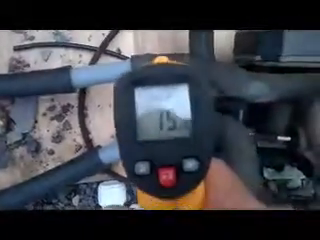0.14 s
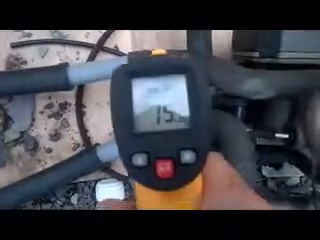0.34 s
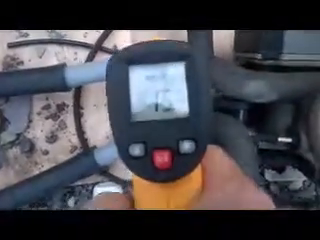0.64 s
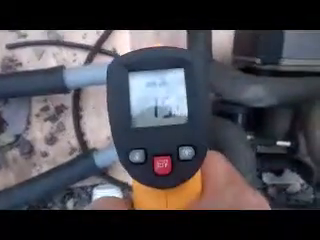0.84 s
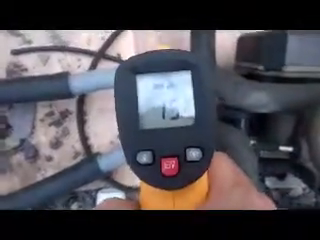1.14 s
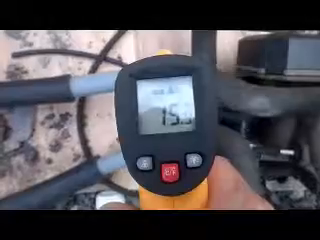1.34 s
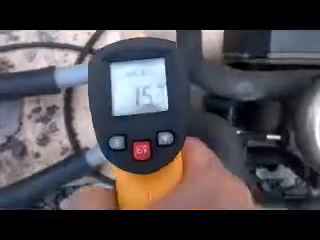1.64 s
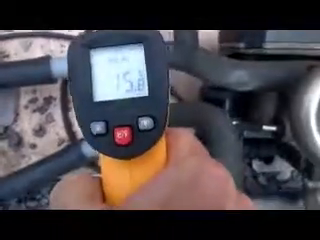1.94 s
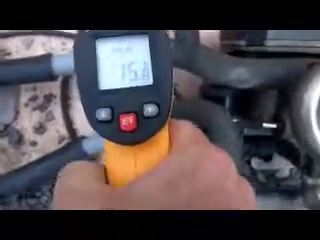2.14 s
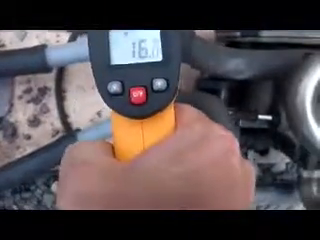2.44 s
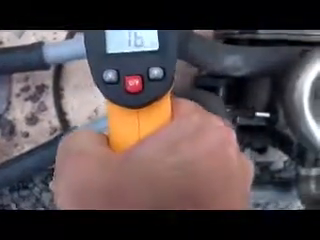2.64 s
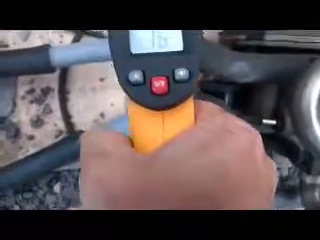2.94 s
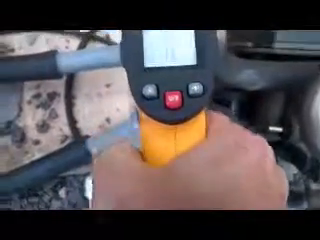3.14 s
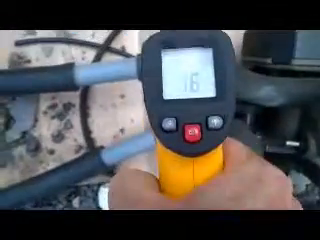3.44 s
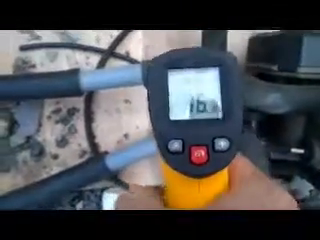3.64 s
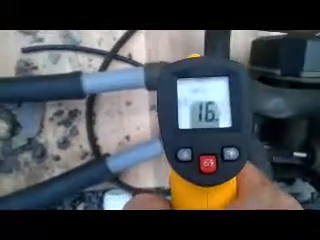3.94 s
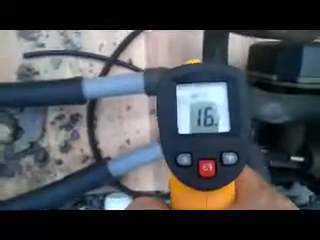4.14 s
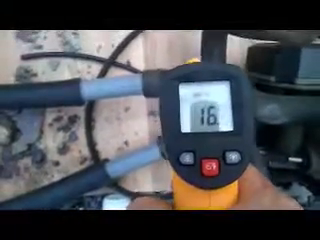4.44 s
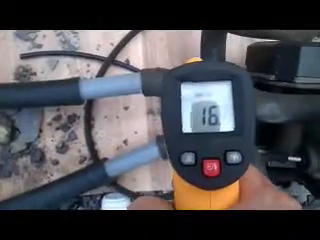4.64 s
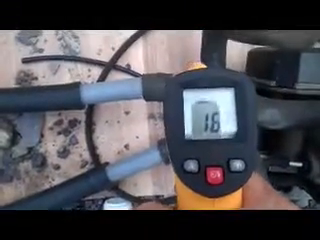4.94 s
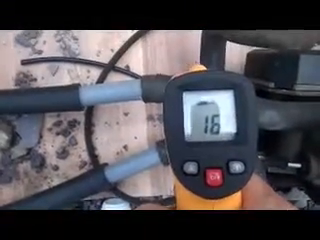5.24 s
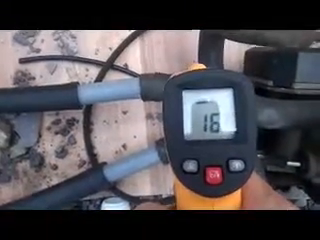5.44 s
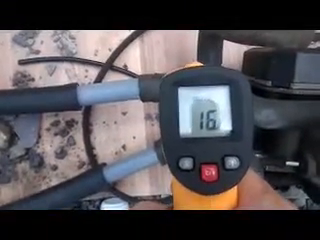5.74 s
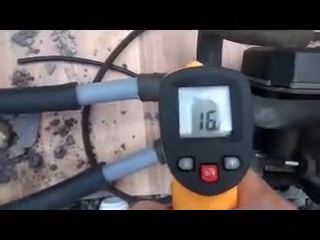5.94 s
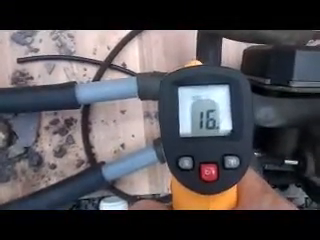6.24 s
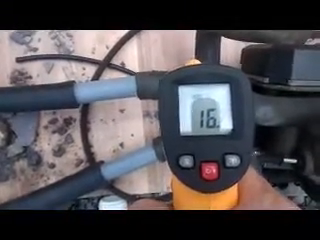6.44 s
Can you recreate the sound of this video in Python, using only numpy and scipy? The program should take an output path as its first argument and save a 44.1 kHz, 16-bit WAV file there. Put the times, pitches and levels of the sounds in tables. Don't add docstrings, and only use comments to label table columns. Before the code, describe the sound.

From 0 to about 6.6 seconds a small diesel heater is already running and never stops, heard by a phone held a step away. At the bottom, a throb near 63 hertz swells irregularly several times a second, with soft chamber rumble and a hollow, coloured exhaust roar. A nearly constant blower whine around 2.1 kilohertz carries clearly above, with fainter shaft tones and a breathy rush from the housing. Thin intake hiss and a faint airy whistle near 7.7 kilohertz flicker with tiny lapses. From about 0.33 seconds, crisp fuel-pump ticks fall every half second, each followed by a softer return tick. Around 1.8 to 3 seconds the hiss and ticks grow duller as the phone is shaded and tipped; they reopen around 3.3. After 3.7 the whistle recedes and low housing air grows somewhat fuller. A very faint water-pump hum stays buried. It ends still running.

```python
import sys
import numpy as np
from scipy import signal
from scipy.fft import rfft, irfft, next_fast_len
from scipy.io import wavfile
from scipy.ndimage import uniform_filter1d, map_coordinates

SR = 44100
rng = np.random.default_rng(int(sys.argv[2]) if len(sys.argv) > 2 else 0)


def master(y):
    cut = np.clip(np.atleast_2d(y).T, -1, 1)
    pcm = np.round(cut * 32767)
    wavfile.write(sys.argv[1], SR, pcm.astype(np.int16))


def amplitude_ratio(level_db):
    exponent = np.asarray(level_db, float) / 20
    return 10 ** exponent


N = 290663

# (middle [s], length [s], peak level [dB], pitch [Hz])
FLAME_SURGES = [(0.04, 0.1, -29, 65.5), (0.197, 0.25, -25.0, 62.0), (0.414, 0.17, -29.5, 63.0),
                (0.607, 0.1, -30, 67.0), (0.745, 0.071, -29, 62.5), (0.976, 0.45, -29.5, 63.0),
                (1.206, 0.069, -24.5, 67.6), (1.31, 0.25, -36, 63.0), (1.53, 0.29, -34.5, 61.8),
                (1.802, 0.35, -36.5, 64.66), (2.15, 0.5, -35, 61.8), (2.296, 0.24, -28.0, 63.0),
                (2.725, 0.29, -35, 62.2), (2.813, 0.13, -30.0, 63.3), (2.99, 0.37, -30.5, 60.9),
                (3.218, 0.074, -32, 66.0), (3.413, 0.097, -27.0, 65.6), (3.48, 0.21, -32.5, 61.9),
                (3.664, 0.2, -26.5, 63.0), (3.864, 0.18, -30, 59.7), (4.088, 0.31, -32.5, 60.4),
                (4.232, 0.085, -24.5, 63.0), (4.552, 0.59, -33.0, 61.35), (4.878, 0.66, -33, 61.5),
                (5.106, 0.11, -25, 64.0), (5.338, 0.49, -29.5, 63.0), (5.618, 0.23, -28.5, 62.24),
                (5.896, 0.16, -23, 60.2), (6.063, 0.31, -28.5, 61.6), (6.37, 0.49, -29, 62.1)]
LULL_DB, LULL_HZ = -46.5, 63
FLUTTER_DB_PER_S = 8
# (centre [Hz], width [Hz], level [dB])
CHAMBER_MODES = [(79.4, 21, -6.5), (122, 26, -9)]
# (time [s], roar level [dB])
ROAR_LEVEL = [(0, -35), (.3, -33.5), (.9, -36), (1.25, -34.5), (1.8, -35.5), (2.12, -40), (2.45, -35),
              (2.95, -32), (3.35, -37.5), (3.9, -33), (4.15, -36), (4.45, -33), (4.85, -34), (5.12, -37.5),
              (5.4, -34.5), (5.75, -36), (6.3, -34), (6.59, -36)]
UPPER_PIPE_DB, UPPER_FOLLOWS = -34, 0.15
# (centre [Hz], width [Hz], level [dB])
LOW_PIPE_MODES = [(271, 58, -4.5), (291.6, 42, -2)]
# (centre [Hz], width [Hz], level [dB])
UPPER_PIPE_MODES = [(445, 72, -16.5), (561, 38.2, -1), (824, 58, -13.5), (855, 27, -9.5), (976, 75, -14.5),
                    (1025, 37, -14.5), (1095, 36, -11.5), (1146, 38, -10), (1332, 70, -19), (1394, 99, -15),
                    (1894, 104, -11.5), (2036, 47, -20)]
# (frequency [Hz], density [dB per Hz])
FLAME_NOISE = [(20, -38), (42, -8), (90, -8.5), (140, -11), (200, -13), (370, -22.5), (750, -20),
               (920, -26.5), (1300, -21.5), (1530, -31.5), (1750, -24.5), (2070, -24.5), (2180, -41),
               (2450, -45.5)]
# (time [s], speed [turns/s])
SHAFT_SPEED = [(0, 148.56), (.75, 148.55), (1.1, 148.45), (1.75, 148.6), (2.4, 148.5), (3.9, 148.56),
               (4.3, 148.72), (4.8, 148.76), (5.5, 148.64), (6, 148.58), (6.59, 148.63)]
BLADES = 14
# (multiple of shaft speed [-], level under the blade tone [dB])
SHAFT_ORDERS = [(5, -12), (7, -18), (8, -8), (9, -7), (10, -20), (11, -21), (13, -3), (15, -27), (19, -25),
                (20, -42), (22, -34), (23, -38), (24, -28), (25, -33), (30, -34), (33, -31), (38, -42),
                (43, -58)]
STROKE_S, FIRST_STROKE_S = .4997, .3316
SAG_HZ, FASTEST_S = .115, .2
# (centre [Hz], width [Hz], level [dB])
LOW_CAVITY_MODES = [(2340, 79, -8.5), (2578, 73, 0.5)]
# (centre [Hz], width [Hz], level [dB])
MID_CAVITY_MODES = [(2960, 56, -1), (3212, 170, 4), (3752, 236, 3.5)]
# (centre [Hz], width [Hz], level [dB])
UPPER_CAVITY_MODES = [(4287, 254, 1), (4570, 300, -4.5), (4903, 145, -6.5), (5260, 360, -18)]
# (centre [Hz], width [Hz], level [dB])
WHISTLE_MODES = [(7530, 120, -5), (7740, 170, 0.5), (7960, 140, -2.5)]
# (centre [Hz], width [Hz], level [dB])
GAP_MODES = [(8440, 270, 3.5), (8980, 450, -2.5), (9700, 600, -2), (10400, 500, -9), (10890, 300, -4.5),
             (11220, 100, -9)]
# (frequency [Hz], density [dB per Hz])
FAR_HISS = [(4500, -30), (5800, -16), (6150, -15), (6750, 3.5), (7000, -4), (11400, -7), (11750, -3),
            (12150, -17), (12750, -6), (13000, -10), (13500, -1.5), (14000, -5), (15300, -13), (15750, -6)]
# (middle [s], length [s], change [dB])
AIR_LAPSES = [(0.455, .08, -5), (.55, .06, -3), (1.06, .06, -3), (1.173, 0.084, -10), (1.806, .07, 0),
              (1.91, .07, 3), (1.978, 0.027, -5), (2.08, .12, -4), (2.17, .08, -5), (2.42, .1, -1),
              (2.77, 0.19, -8), (2.939, 0.098, -5), (3.8, 0.11, -4.5), (4.107, .2, -5), (4.28, .06, -2.5),
              (4.4, .14, -1), (4.96, .08, -3), (5.092, 0.054, -5), (5.166, 0.064, -4), (5.738, .16, -2.5),
              (5.866, .06, -5)]
# (centre [Hz], width [Hz], level [dB])
PUMP_BODY_MODES = [(7000, 1500, -14), (9800, 2200, 0), (14000, 2500, -22)]
# (frequency [Hz], level [dB])
WATER_PUMP_TONES = [(3942, -89), (5257, -78), (5913, -99), (15437, -106)]
# (time [s], turned to the housing [0-1], shaded by a hand [0-1], tipped down [0-1])
PHONE_HOLD = [(0, 0.4, 0, 0), (.45, 0, .1, 0), (1.4, 0.1, 0, 0.17), (1.75, 0, .6, 0), (2.05, 0, .9, 0),
              (2.4, 0, .8, 0.3), (2.65, 0.16, 1, 0.9), (2.85, .1, 1, 0.8), (3.05, 0.14, .2, 1),
              (3.45, 0, -.3, 0.7), (3.7, 0.83, 0, 0.04), (4.1, 0.94, 0, 0), (4.5, 0.97, -.3, 0.3),
              (5, 0.92, -.1, .1), (5.4, 0.7, .1, 0.17), (5.8, .9, -.1, 0), (6.2, 0.95, -.1, 0.15),
              (6.59, 0.71, 0, 0.23)]
PART_LEVELS = {"blade": (-43, -2.5, .5, -0.5), "low cavity": (-59.5, 3.5, -4.5, 1),
               "mid cavity": (-57.5, 0.5, 0, -3), "upper cavity": (-53, -.6, .1, -3.5),
               "gaps": (-67.5, -1.5, -4, -0.3), "whistle": (-70, -5.5, -3, 2), "far": (-78, -1, 1, -1),
               "pump": (-52.5, 0.5, -3, -3)}
# (frequency [Hz], depth [dB])
MASKING_DEPTH = [(4800, 30), (5400, 7), (5800, 6), (6200, 2.5), (7200, 13), (8200, 7), (8800, 10),
                 (10500, 8), (11450, 3.5), (12200, 5), (13000, 4), (14000, 3), (15800, 2.5)]
TOP_HZ = 15770


def flame():
    middle, length, peak_db, pitch_hz = np.transpose(FLAME_SURGES)
    bumps = swells(middle, length) * amplitude_ratio(peak_db)[:, None]
    size = bumps.sum(0) + amplitude_ratio(LULL_DB)
    hz = full((pitch_hz @ bumps + LULL_HZ * amplitude_ratio(LULL_DB)) / size)
    db = full(20 * np.log10(size))
    flutter_db = FLUTTER_DB_PER_S * full(length @ bumps / size) * wobble(21)
    throb = amplitude_ratio(db + flutter_db) * tone(hz + 2.37 * wobble(16))
    rumble = amplitude_ratio(-36 + 0.37 * (db + 32.5)) * rush(modes(CHAMBER_MODES, steep=1.36))
    return filtered(throb + rumble, lambda f: 1 / np.sqrt(1 + (44 / (f + 1)) ** 10))


def exhaust():
    low_db, = curves(ROAR_LEVEL)
    upper_db = UPPER_PIPE_DB + UPPER_FOLLOWS * (low_db - low_db.mean())
    flicker = wobble(6)
    low = amplitude_ratio(low_db - 0.07 + 0.56 * flicker) * rush(modes(LOW_PIPE_MODES, steep=2.6))
    upper = amplitude_ratio(upper_db + 0.67 * flicker) * rush(modes(UPPER_PIPE_MODES, steep=1.59))
    broad = amplitude_ratio(-35.0 + 0.47 * flicker) * rush(slope(FLAME_NOISE))
    return low + upper + broad


def blower():
    since_fastest = np.arange(N) / SR - FASTEST_S
    shaft_hz = curves(SHAFT_SPEED)[0] + SAG_HZ * np.cos(2 * np.pi * since_fastest / STROKE_S)
    orders = sum(amplitude_ratio(-44 + db + 1.1 * wobble(3.76)) * tone(k * shaft_hz) for k, db in SHAFT_ORDERS)
    blade = amplitude_ratio(heard("blade") + 0.35 * wobble(15)) * tone(BLADES * shaft_hz)
    return blade + orders


def housing():
    low = amplitude_ratio(heard("low cavity") + 1.2 * wobble(9)) * rush(modes(LOW_CAVITY_MODES, steep=1.35))
    mid = amplitude_ratio(heard("mid cavity") + 1.3 * wobble(7)) * rush(modes(MID_CAVITY_MODES, steep=1.53))
    upper = amplitude_ratio(heard("upper cavity") + 0.89 * wobble(6)) * rush(modes(UPPER_CAVITY_MODES, steep=1.96))
    return low + mid + upper


def fuel_pump():
    t = np.arange(SR // 50) / SR
    blows = np.zeros(N + SR)
    for s in np.arange(FIRST_STROKE_S, N / SR, STROKE_S):
        for delay, blow_db in [(-.003, -14), (0, 1), (.013, -10), (.121, -7)]:
            crack = amplitude_ratio(-60 * t / 0.017) * rng.standard_normal(len(t))
            blows[round((s + delay) * SR):][:len(t)] += amplitude_ratio(blow_db + 6.5) * crack
    return amplitude_ratio(heard("pump")) * filtered(blows[:N], modes(PUMP_BODY_MODES, steep=2.4))


def intake():
    middle, length, change_db = np.transpose(AIR_LAPSES)
    flow_db = full(change_db @ swells(middle, length)) + 0.94 * wobble(11)
    gaps = amplitude_ratio(heard("gaps") + flow_db + 1.7 * wobble(35)) * rush(modes(GAP_MODES, steep=1.9))
    whistle_db = heard("whistle") + 1.1 * flow_db + 0.62 * wobble(9) + 0.77 * wobble(30)
    whistle = amplitude_ratio(whistle_db) * rush(modes(WHISTLE_MODES, steep=1.6))
    return gaps + whistle + amplitude_ratio(heard("far")) * rush(slope(FAR_HISS))


def water_pump():
    return sum(amplitude_ratio(db) * tone(np.full(N, hz)) for hz, db in WATER_PUMP_TONES)


def heard(part):
    db, *change_db = PART_LEVELS[part]
    return db + np.dot(change_db, curves(PHONE_HOLD))


def swells(middle, length):
    u = (np.arange(0, N + 63, 64) / SR - np.c_[middle]) / np.c_[length]
    return np.cos(np.pi * np.clip(u, -.5, .5)) ** 2


def full(x):
    return np.interp(np.arange(N) / 64, np.arange(len(x)), x)


def curves(rows):
    s, *cols = np.transpose(rows)
    return [np.interp(np.arange(N) / SR, s, c) for c in cols]


def wobble(rate):
    knots = rng.standard_normal(int(N * rate / SR) + 4)
    return map_coordinates(knots, [np.arange(N) * rate / SR])


def tone(hz):
    return np.sqrt(2) * np.sin(2 * np.pi * (np.cumsum(hz) / SR + rng.random()))


def rush(gain):
    return unit(filtered(rng.standard_normal(N), gain))


def unit(x):
    return x / np.sqrt(np.mean(x ** 2) + 1e-20)


def filtered(x, gain):
    m = next_fast_len(N + 8192)
    return irfft(rfft(x, m) * gain(np.fft.rfftfreq(m, 1 / SR)), m)[:N]


def slope(points):
    f, db = np.transpose(points)
    return lambda hz: amplitude_ratio(np.interp(np.log(hz + 1), np.log(f + 1), db, right=-120))


def modes(table, steep):
    return lambda hz: np.sqrt(sum(amplitude_ratio(2 * db) / (1 + (2 * (hz - c) / w) ** 2) ** steep for c, w, db in table))


def unmasked(x):
    hz, _, z = signal.stft(np.pad(x, (0, SR // 4), "reflect"), SR, nperseg=2048, boundary="odd")
    power = abs(z) ** 2
    near = uniform_filter1d(uniform_filter1d(power, size=8, axis=0), size=2, axis=1)
    wide = uniform_filter1d(uniform_filter1d(power, size=36, axis=0), size=5, axis=1)
    limit = wide * amplitude_ratio(-2 * np.interp(hz, *np.transpose(MASKING_DEPTH)))[:, None]
    kept = z / (1 + (limit / (abs(near) + 1e-30)) ** 8)
    return signal.istft(kept, SR, nperseg=2048)[1][:N]


def scene():
    return (flame() + exhaust() + blower() + housing() + fuel_pump() + intake() + water_pump())[None]


def low_pass(x):
    return signal.sosfilt(signal.butter(12, 15830, fs=SR, output="sos"), x)


def record(dry):
    kept = filtered(unmasked(dry[0]), lambda hz: hz < TOP_HZ)
    return low_pass(kept[None])


dry = scene()
out = record(dry)
master(out)
```